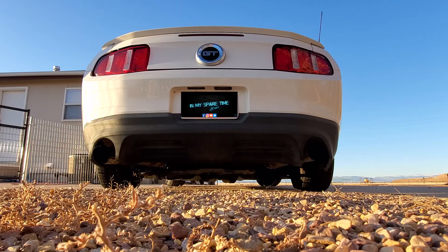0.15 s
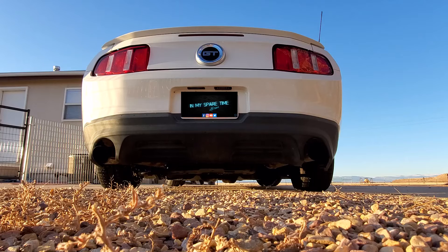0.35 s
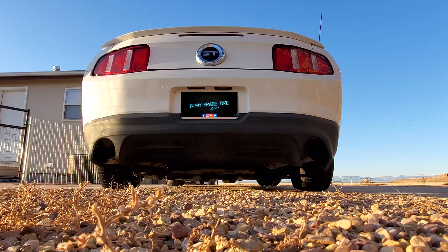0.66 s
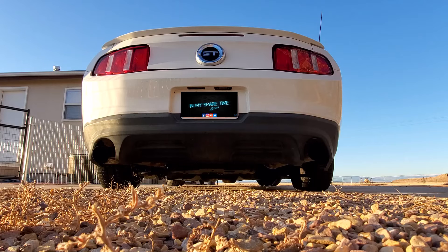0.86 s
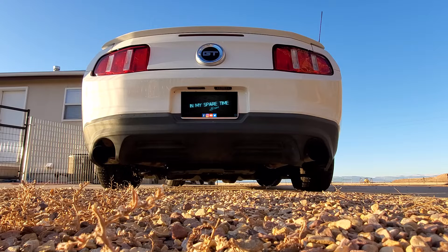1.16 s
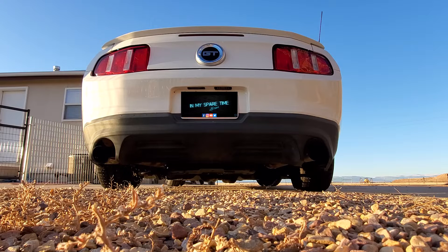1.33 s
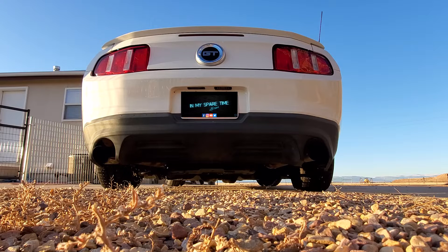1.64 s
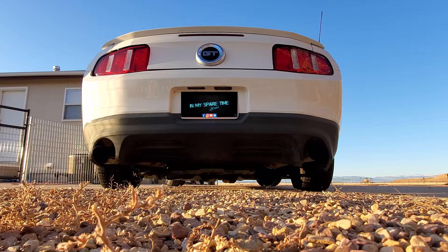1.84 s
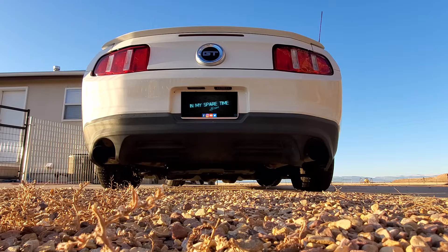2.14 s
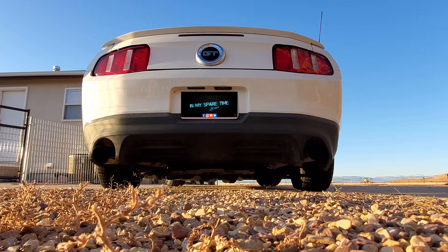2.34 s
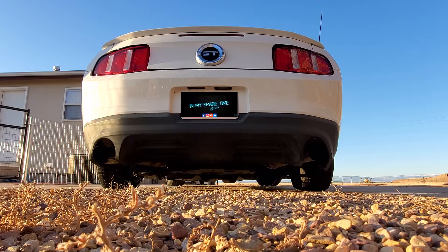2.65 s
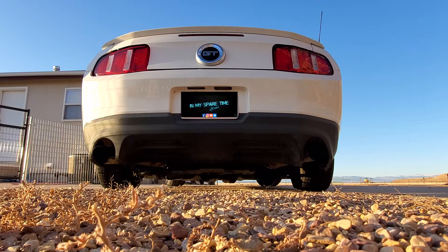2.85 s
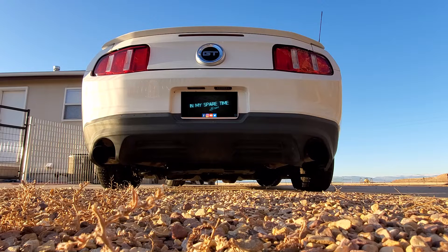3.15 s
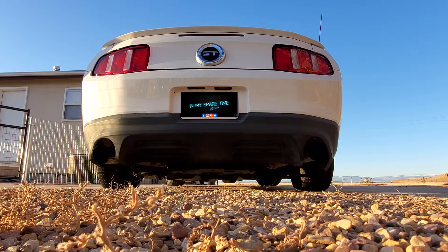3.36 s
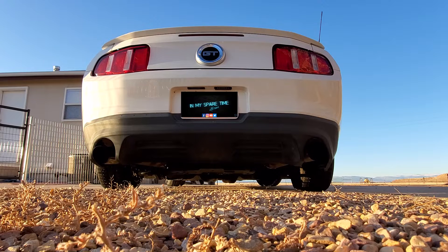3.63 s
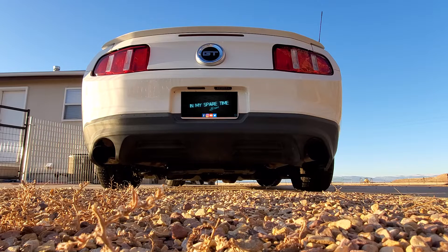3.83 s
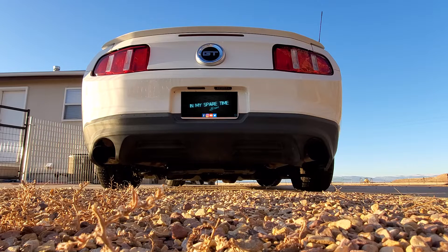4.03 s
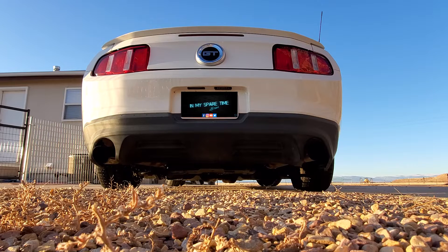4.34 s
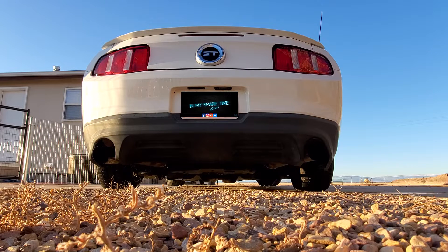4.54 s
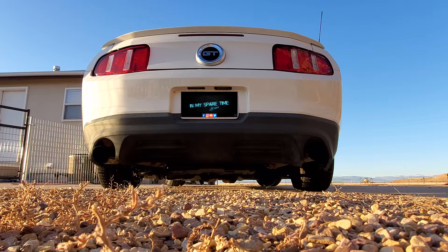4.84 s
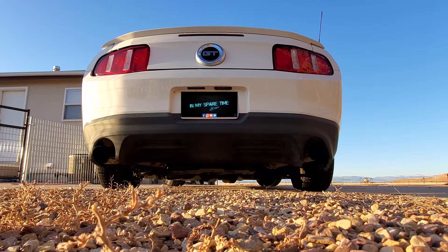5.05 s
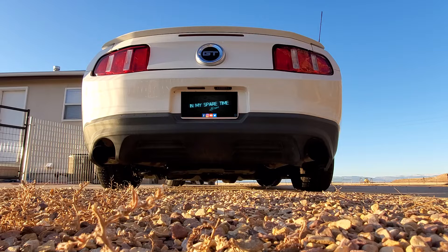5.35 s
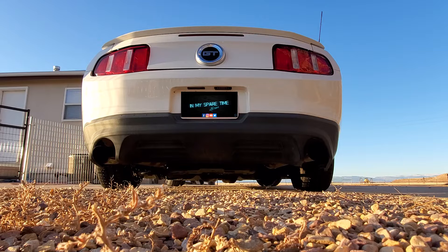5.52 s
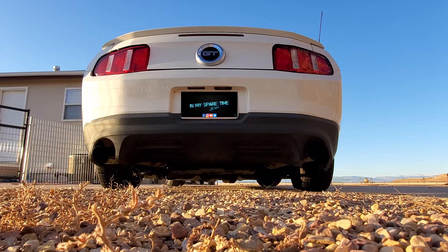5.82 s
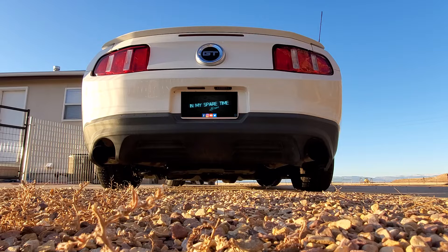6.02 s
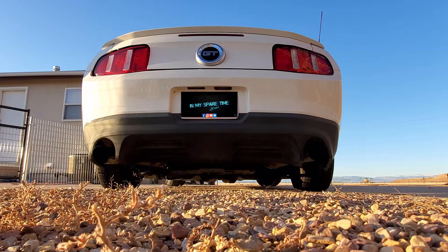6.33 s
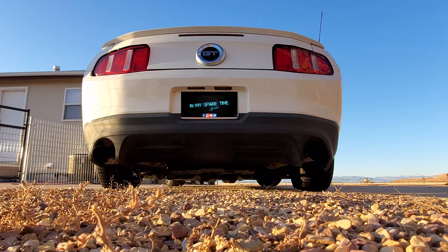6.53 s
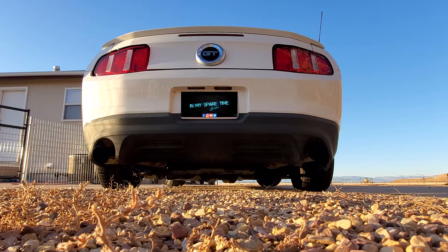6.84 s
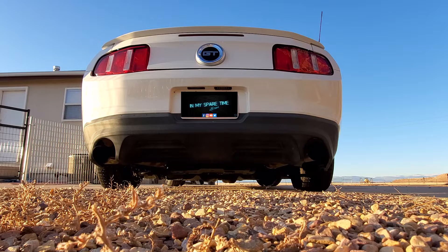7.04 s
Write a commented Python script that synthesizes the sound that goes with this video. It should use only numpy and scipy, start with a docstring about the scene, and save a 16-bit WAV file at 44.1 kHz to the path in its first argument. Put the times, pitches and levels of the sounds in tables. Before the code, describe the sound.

Outdoors on gravel, close behind the two open tailpipes of a V8 car, dry stereo. For the first 0.2 s there is only quiet air and a low hum. At 0.2 s the starter clacks in; a rough whine climbs while gears grind and groan, with rattles and dull pipe thumps at about 0.4, 0.5, 0.6, 0.7, 0.75 and 0.85 s, coming faster. At 0.9 s the engine catches with loud, ragged, cracking blows and a short roar, flares to a single hard tone around 1.1-1.35 s, then falls back, its boom dipping near 1.5 s. A deep, fast, loping idle follows, with a thin faint whistle clearest around 2-2.8 s. From 2.5 s gas rasp and ticking grow; small crackles pop from 3.6 s. Around 5 s the idle settles slightly slower and throatier, with sharper ticks snapping out, continuing until 7.2 s.

```python
"""Outdoors, from the gravel just behind the two tailpipes of a V8 without mufflers; still air and a low hum all round.
The starter clacks in, whines and cranks, with a thump down the pipes and a gear rattle at each compression.
The engine catches with hard ragged blows, flares once and falls back to a loping fast idle, under a thin whistle.
Two banks of pulses ring modelled pipe resonances; noise puffs and sharp ticks add the gas rush and the edge.
Gas and ticks then grow with the load, single ticks snap out, and the idle settles to a slower lope."""
import sys
import numpy as np
from scipy import signal
from scipy.fft import rfft, irfft
from scipy.io import wavfile
from scipy.ndimage import uniform_filter1d

SR = 44100
rng = np.random.default_rng(int(sys.argv[2]) if len(sys.argv) > 2 else 0)


def pcm_store(signal):
    """Save signal as 16-bit PCM."""
    levels = np.round(np.clip(np.atleast_2d(signal), -1, 1) * 32767)
    wavfile.write(sys.argv[1], SR, levels.astype(np.int16).T)


N = 316638
TIME = np.arange(N) / SR
FIRST_FIRING_S = .912

# crank speed: [t/s, firing rate/Hz]
SPEED = [(0.91, 8.35), (1.0, 72.61), (1.1, 74.16), (1.25, 90.31), (1.6, 74.98), (2.0, 65.71), (2.35, 63.65),
         (2.8, 66.32), (3.2, 71.2), (3.4, 68.55), (3.85, 70.83), (4.5, 68.01), (5.85, 63.47), (6.75, 63.78),
         (7.18, 62.43)]
# the bank, 0 or 1, that each cylinder fires into, in firing order
BANKS = [0, 1, 1, 0, 1, 0, 0, 1]
# colour of the ticks: [f/Hz, level/dB]
TICK_COLOUR = [(1120, -37.5), (1900, -6.5), (2830, -2.5), (3380, -3.5), (3690, -3), (4860, -2), (5310, -5),
               (5860, -4.5), (7500, -6.5), (9530, -15.5), (12700, -14), (14700, -7.5), (15800, -23)]


def undb(db):
    """Amplitude ratio of a level in dB."""
    return 10 ** (np.asarray(db) / 20)


def curves(rows):
    """The columns of a table, joined by straight lines in time."""
    s, *columns = np.transpose(rows)
    return [np.interp(TIME, s, c) for c in columns]


def unit(x):
    """Scale to an RMS of 1."""
    return x / np.sqrt(np.mean(x ** 2))


def steady(x):
    """Unit level over about two engine cycles, so that the throb within a cycle stays."""
    size = SR // 8
    power = np.mean(np.atleast_2d(x) ** 2, axis=0)
    power = uniform_filter1d(uniform_filter1d(power, size), size)
    return x / np.sqrt(np.abs(power) + 1e-3 * np.mean(power))


def colour(x, points):
    """Causal minimum-phase filter whose spectrum passes through (Hz, dB) points."""
    size = 8192
    hz, db = np.transpose(points)
    f = np.maximum(np.fft.rfftfreq(size, 1 / SR), 1)
    magnitude = undb(np.interp(np.log(f), np.log(hz), db))
    # folding the cepstrum forward in time makes the filter causal
    cepstrum = irfft(np.log(magnitude))
    cepstrum[1:size // 2] *= 2
    cepstrum[size // 2 + 1:] = 0
    response = irfft(np.exp(rfft(cepstrum)))
    return signal.fftconvolve(np.atleast_2d(x), response[None], axes=1)[:, :N]


def resonate(x, hz, width_hz):
    """One resonance, with a gain of 1 at its peak."""
    return signal.lfilter(*signal.iirpeak(hz, hz / width_hz, SR), x + 1e-18)


def band(x, order, edge_hz, kind):
    """Butterworth filter: low, high or band."""
    return signal.sosfilt(signal.butter(order, edge_hz, kind, fs=SR, output="sos"), x)


def clicks(times, sizes):
    """Impulses, each shared between two samples."""
    place = np.clip(np.asarray(times) * SR, 0, N)
    i = place.astype(int)
    early = np.bincount(i, sizes * (1 - place + i), N + 2)
    late = np.bincount(i + 1, sizes * (place - i), N + 2)
    return (early + late)[:N]


def fade(x, decay_s):
    """Each impulse becomes a dying tail of the same height."""
    return signal.lfilter([1], [1, -np.exp(-1 / (decay_s * SR))], x + 1e-18)


def pan(left_db):
    """Left and right gains that differ by left_db."""
    return undb(np.array([[1], [-1]]) * left_db / 2)


def noise(side_db, pan_db=0):
    """Stereo noise of unit level with a given width and lean to the left."""
    mid, side = rng.standard_normal((2, N))
    side = side * undb(side_db)
    return unit(np.array([mid + side, mid - side]) * pan(pan_db))


def wander(rate):
    """Random drift with a spread near 1, drawn afresh rate times a second."""
    knots = np.arange(0, N / SR + 1, 1 / rate)
    return np.interp(TIME, knots, rng.standard_normal(len(knots)))


def envelope(start_s, attack_s, fall_db_per_s, end_s, release_s):
    """Attack, a slowly falling hold, release."""
    age = np.maximum(TIME - start_s, 0)
    release = np.exp(-np.maximum(TIME - end_s, 0) / release_s)
    return np.minimum(age / attack_s, 1) * undb(-fall_db_per_s * age) * release


def yard():
    """A low machine hum nearby, as wavering sines, over the coloured noise of still air."""
    # hum partials: [f/Hz, level/dB]
    hum_partials = [(54, -56), (72, -34), (86.8, -55.5), (101.2, -53), (114.8, -44.5), (157, -56.5)]
    # colour of the still air: [f/Hz, level/dB]
    air_colour = [(18, -68.5), (30, -43.5), (53, -10.5), (76, -11.5), (178, -16.5), (286, -24),
                  (550, -46.5), (863, -35), (954, -45), (2080, -69.5), (12000, -91.5), (15600, -116),
                  (22000, -120)]
    hum = 0
    for hz, db in hum_partials:
        phase = 2 * np.pi * (hz * TIME + rng.random()) + 0.28 * wander(5.3)
        hum = hum + undb(db) * np.sqrt(2) * np.sin(phase)
    return hum + undb(-44.5) * unit(colour(noise(-1.5), air_colour))


def starter():
    """The solenoid clacks; gears grind in their housing, harder at each compression, which thumps down the pipes."""
    # compressions while cranking: [t/s, relative gear rattle level/dB, thump level/dB]
    strokes = [(0.397, -2, -19.5), (0.504, 4.5, -21.5), (0.598, 3, -21.5), (0.678, 9, -23),
               (0.756, 7.5, -21.5), (0.827, 8, -24), (0.87, 0, -16)]
    # colours of the gears and of the solenoid: [f/Hz, level/dB]
    gear_colour = [(88, -38.5), (160, -0.5), (300, -2.5), (390, -4.5), (464, -2.5), (522, -6.5), (575, -1),
                   (660, -11), (786, -10), (866, -6), (1030, -6.5), (1650, -24), (1780, -24.5),
                   (3880, -18.5), (8980, -46.5), (15800, -44.5)]
    clack_colour = [(120, -68), (200, -17), (439, -15), (567, -5), (1240, 1), (2000, -19), (3870, -14),
                    (5890, -19.5), (8960, -41), (15800, -26)]
    # housing resonances: [f/Hz, width/Hz, level/dB]
    housing = [(478, 30, 8), (818, 16, 10), (1020, 25, 12.5), (1060, 20, 2.5), (1240, 28, 5.5),
               (1740, 9.7, -2.5), (1820, 13, -8), (2250, 18, -12), (2810, 18, -12.5), (3250, 26, -7.5),
               (3150, 16, -8), (3860, 46, -12.5), (3840, 14, -8.5), (4244, 26, -4.5), (4578, 16, -8)]
    times, rattle_db, thump_db = np.transpose(strokes)
    # each compression loads the gears quickly and lets them go slowly
    strain = fade(clicks(times, undb(rattle_db)), decay_s=.026)
    load = 1 + uniform_filter1d(strain, size=300)
    teeth = load * undb(2.2 * wander(300))
    grind = unit(colour(noise(-11.0, pan_db=2.5), gear_colour)) * teeth
    drive = noise(-3.0) * teeth
    ring = sum(undb(db) * resonate(drive, hz, width) for hz, width, db in housing)
    engaged = undb(-31) * envelope(.205, attack_s=0.0067, fall_db_per_s=9.5, end_s=1.2, release_s=0.034)
    gears = (undb(-10.0) * grind + undb(-12.0) * unit(ring)) * engaged
    clack = unit(colour(noise(0), clack_colour)) * fade(clicks([.208, .221], undb([-31.5, -34])), 0.015)
    thumps = thump(times, thump_db, hz=73.7, width_hz=63, deep_db=-2)
    return gears + clack + thumps + groans() + whine()


def whine():
    """The starter's gears whine on a rough, broken pair of tones, left of centre; the pinion clinks as it is thrown out."""
    # spin-up, labouring, letting go and coasting: [t/s, mean f/Hz, level/dB]
    spin = [(.205, 1700, -76), (.25, 2300, -58), (.3, 3150, -60), (.36, 3800, -57), (.41, 4150, -59),
            (.44, 3850, -57), (.51, 4550, -60), (.57, 5000, -66), (.64, 5300, -68), (.72, 5350, -74),
            (1.0, 5400, -77), (1.3, 5000, -86), (1.48, 4450, -80), (1.62, 3900, -81), (1.73, 3250, -84),
            (1.88, 2800, -83), (2.0, 2500, -100)]
    pitch_flutter, level_flicker_db = .027, 4.5  # pitch as a share
    hz, db = curves(spin)
    flutter = pitch_flutter * (wander(600) + .5 * wander(40))
    phase = 2 * np.pi * np.cumsum(hz * (1 + flutter)) / SR
    first = undb(level_flicker_db * wander(70)) * np.sin(phase)
    second = undb(level_flicker_db * wander(70)) * np.sin(1.1 * phase)
    turning = (TIME > .205) * (TIME < spin[-1][0])
    tones = (first + undb(-6.0) * second) * undb(db) * turning * pan(14)
    clink = unit(resonate(noise(1.5), 2760, 350)) * fade(clicks([1.052], undb([-43.5])), 0.016)
    return tones + clink


def groans():
    """The straining starter groans on rough tones of its housing."""
    # groans: [t/s, length/s, f/Hz, starting level/dB]
    groan_rows = [(0.237, 0.083, 516, -46), (.405, 0.051, 799, -39), (0.415, 0.031, 1060, -43),
                  (0.502, 0.052, 465, -35.5), (0.506, 0.034, 795, -38), (.53, 0.023, 880, -44),
                  (.6, 0.042, 470, -39), (.602, 0.03, 1020, -46), (0.68, 0.113, 1013, -43.5),
                  (.756, 0.022, 1050, -38.5), (.824, 0.018, 554, -34.5), (.827, .05, 1010, -46)]
    out = 0
    for s, length_s, hz, db in groan_rows:
        roughness = 0.77 * wander(90.3) + 0.17 * np.array([wander(150), wander(150)])
        tone = np.sin(2 * np.pi * hz * TIME + roughness) * undb(db + 2.5 * wander(120))
        out = out + tone * envelope(s, .008, 35, s + length_s, 0.0096)
    return out


def thump(times, peak_db, hz, width_hz, deep_db):
    """Dull blows down the pipes: a few heavy swings that swell in, with a deeper push and a throaty overtone."""
    blows = clicks(times, undb(peak_db))
    blows = uniform_filter1d(uniform_filter1d(blows, size=210), size=210)
    swings = resonate(resonate(blows, hz, width_hz), hz, width_hz)
    deep = resonate(resonate(blows, 52, 24), 52, 24)
    throaty = resonate(resonate(blows, 135, 63), 135, 50)
    mix = resonate(swings + undb(deep_db) * deep, hz, 0.62 * hz) + undb(-2) * throaty
    # the tallest swing reaches the highest peak asked for
    return -mix * undb(np.max(peak_db)) / np.abs(mix).max()


def catch():
    """The first hard firings thump down the pipes."""
    # firings: [t/s, relative level/dB]
    first_firings = [(0.91, -2), (0.962, -4), (0.985, -5.5), (1.004, -4), (1.04, -3.5)]
    return thump(*np.transpose(first_firings), hz=79.8, width_hz=41, deep_db=-6)


def settled():
    """Near 0 at fast idle, rising smoothly towards 1 in the slow lope."""
    middle_s, spread_s = 5.05, 0.86
    return .5 + .5 * np.tanh((TIME - middle_s) / (2 * spread_s))


def effort(unloaded_db, flare_db, load_db, settle_db):
    """A layer's gain as the throttle shuts after the flare, the load builds up and the idle settles."""
    flare_end_s, flare_release_s, load_from_s, load_rise_s = 1.235, 0.071, 2.52, 1.16
    flare = 1 / (1 + np.maximum(TIME - flare_end_s, 0) / flare_release_s)
    load = 1 - np.exp(-np.maximum(TIME - load_from_s, 0) / load_rise_s)
    return undb(unloaded_db + flare_db * flare + load_db * load + settle_db * settled())


def sag():
    """The gain of the pipes dips quickly while the revs fall back and recovers slowly."""
    dip_db, dip_at_s, in_s, out_s = -7.5, 1.52, 0.38, .62
    late = TIME - dip_at_s
    return undb(dip_db * np.exp(-(late / np.where(late < 0, in_s, out_s)) ** 2))


def cycle_swell(depth_db, turns, place):
    """A gain that swells once an engine cycle, at a place counted in firings."""
    return undb(depth_db * np.cos(2 * np.pi * (turns - place) / len(BANKS)))


def engine():
    """Eight cylinders fire in turn into two banks: each firing gives a boom, a puff of gas and a tick."""
    # cylinders in firing order: [strength level/dB, valve timing t/s]
    cylinders = [(2.4, -0.00641), (2.5, -0.00527), (-1.5, -0.00682), (0.4, -0.00829), (1.0, -0.00529),
                 (-0.8, -0.00793), (-1.7, -0.0083), (-1.1, -0.00636)]
    # sharpness of each blow, in firing order: [gas level/dB, tick level/dB]
    edges = [(3.5, 6.5), (1.5, -2.5), (-1, -3), (-0.5, 1), (1, 1.5), (-0.5, -3.5), (-0.5, -5), (3.5, 2)]
    turns = np.cumsum(curves(SPEED)[0] * (TIME >= FIRST_FIRING_S)) / SR  # counted in firings
    firing = np.arange(int(turns[-1]) + 1)
    times = np.maximum(np.interp(firing, turns, TIME), FIRST_FIRING_S)
    order = np.c_[BANKS, cylinders, edges]
    bank, strength_db, timing, gas_edge, tick_edge = order[firing % len(BANKS)].T
    chance = rng.standard_normal((len(firing), 4)).T
    # combustion is ragged just after the catch, then repeats closely
    ragged = 1 + 3 * np.exp(-(times - FIRST_FIRING_S) / .5)
    size = undb(strength_db + 0.56 * ragged * chance[0])
    opens = times + timing + .00007 * ragged * chance[1]
    blows = times - .003
    sharp = undb(gas_edge + 0.68 * chance[2])
    fronts = blows + .0001 * ragged * chance[1]
    # in the rev, where the firing rate meets the pipe resonance, the lope gives way to one tone
    rev = undb(-6) * envelope(1.068, attack_s=0.15, fall_db_per_s=42, end_s=1.37, release_s=0.053)
    lope = boom(opens, size, bank) * boom_gain(rev)
    rev_tone = rev * undb(1.8 * wander(60)) * np.sqrt(2) * np.sin(2 * np.pi * turns)
    overtones = bark(clicks(opens, size * np.where(bank, 1, .45)), turns)
    rasp = puffs(blows, sharp, turns) + ticks(blows, undb(tick_edge + 1.6 * chance[3]))
    rasp = rasp + blast(fronts, sharp, bank)
    running = np.clip((TIME - FIRST_FIRING_S) / 0.068, 0, 1)
    return (lope + overtones + burble(turns) + rasp) * running + rev_tone


def boom(opens, size, bank):
    """Each bank's pulses ring its pipe; the settled lope moves its weight up the pipe."""
    # change once settled: [f/Hz, width/Hz, share added]
    lope_shift = [(87, 7.5, -0.25), (145, 93, 0.39)]
    pipes = steady(sum(tailpipe(clicks(opens, size * (bank == b)), b) for b in (0, 1)))
    shift = sum(share * resonate(pipes, hz, width) for hz, width, share in lope_shift)
    return pipes + settled() * shift


def boom_gain(rev):
    """The boom takes over from the first hard firings and yields power to the rev, keeping at least half."""
    gain = effort(unloaded_db=-13.5, flare_db=3.5, load_db=-0.67, settle_db=-1.7)
    power = (gain * sag()) ** 2
    left_over = np.sqrt(np.maximum(power - rev ** 2, 0.5 * power))
    return left_over * np.clip((TIME - 0.92) / 0.17, 0, 1)


def tailpipe(pulses, bank):
    """One bank's pipe rings; its open end radiates no deep bass, and the long run dulls the pulse."""
    # pipe resonances: [f/Hz, width/Hz, signed share of the first bank, of the second bank]
    pipe_modes = [(54.1, 19.0, 0.169, 0.365), (87.3, 12.0, 0.186, 1.0), (101.1, 42.0, -0.477, -0.797),
                  (126.6, 13.0, 0.24, 0.416), (150.8, 24.0, 0.434, 0.12), (159.9, 18.0, -0.13, 0.052),
                  (188.0, 21.0, 0.111, 0.063), (206.9, 16.0, -0.05, 0.055), (234.8, 20.0, 0.017, 0.054),
                  (265.3, 24.0, 0.022, 0.017), (288.7, 22.0, -0.039, 0.003), (303.3, 24.0, 0.046, 0.005),
                  (324.4, 22.0, -0.07, 0.031), (334.2, 25.0, 0.048, -0.039), (367.0, 24.0, 0.004, 0.015),
                  (393.6, 24.0, 0.005, 0.03), (409.3, 19.0, 0.038, -0.042), (424.9, 26.0, -0.026, 0.031),
                  (467.6, 20.0, 0.025, -0.08), (470.3, 20.0, -0.022, 0.073), (507.1, 24.0, 0.003, 0.005),
                  (530.7, 22.0, 0.004, -0.006)]
    ring = sum(shares[bank] * resonate(pulses, hz, width) for hz, width, *shares in pipe_modes)
    return band(band(ring, 6, 850, "low"), 4, 52, "high")


def puffs(blows, sharp, turns):
    """Each blow lets out a short puff of rushing gas over a faint steady rush."""
    # colour of the gas rush: [f/Hz, level/dB]
    gas_colour = [(150, -5), (300, 11.5), (480, 6.5), (650, -1.5), (850, -5), (1050, -15), (1300, -18),
                  (1600, -38.5), (2500, -54)]
    bursts = fade(clicks(blows, sharp), decay_s=.007)
    gas = colour((bursts + 0.1) * rush(turns), gas_colour)
    return steady(gas) * effort(unloaded_db=-41, flare_db=7.5, load_db=11, settle_db=-4.5)


def rush(turns):
    """Gas leaving the pipes: slow swirls largely repeat with the crank, fine turbulence does not."""
    swirl_hz = 800  # the swirls lie below, the turbulence above
    size = SR // len(BANKS)
    place = turns % len(BANKS) / len(BANKS) * size
    pattern = np.interp(place, np.arange(size), rng.standard_normal(size))
    swirls = band(0.96 * pattern + 0.63 * noise(-0.76), 3, swirl_hz, "low")
    fine = band(noise(-9.5), 3, swirl_hz, "high")
    # the swell once a cycle runs out over the second before 4.7 s
    depth_db = 4 * np.clip(4.7 - TIME, 0, 1)
    return (swirls + fine * undb(1.5 * settled())) * cycle_swell(depth_db, turns, place=1.7)


def ticks(blows, sizes):
    """Each blow gives a sharp tick of flickering noise, with narrow metallic resonances."""
    # narrow tick resonances: [f/Hz, width/Hz, level/dB]
    tick_modes = [(1720, 15, 6), (1800, 9, 7), (2850, 19, 4), (3280, 34, 1.5), (3450, 25, 3), (3970, 14, 5),
                  (4620, 25, 5)]
    taps = uniform_filter1d(fade(clicks(blows, sizes), 0.012), size=110)
    hiss = noise(0.46, pan_db=5.5) * undb(2.2 * wander(500))
    dry_ticks = colour((taps + 0.2) * hiss, TICK_COLOUR)
    ring = sum(undb(db) * resonate(dry_ticks, hz, width) for hz, width, db in tick_modes)
    gain = effort(unloaded_db=-72.5, flare_db=18.5, load_db=13.5, settle_db=-1)
    return steady(dry_ticks + ring * undb(-3.5)) * gain


def blast(times, sizes, bank):
    """The steep front of each blow rings the upper resonances of its pipe, one pipe to each side."""
    # upper pipe resonances: [f/Hz, width/Hz, level/dB]
    throat = [(585, 77, 0), (646, 42, 2.5), (812, 62, -0.5), (900, 200, -6.5), (1100, 190, -10.5),
              (1220, 120, -12), (1270, 99, -15.5)]
    out = 0
    for b, lean_db in enumerate((5, -5)):
        fronts = clicks(times, sizes * (bank == b))
        ring = 0
        for k, (hz, width, db) in enumerate(throat):
            ring = ring + (-1) ** k * undb(db) * resonate(fronts, hz, width)
        out = out + ring * pan(lean_db)
    out = signal.sosfilt(signal.cheby1(6, 1, [480, 1400], "band", fs=SR, output="sos"), out)
    return steady(out) * effort(unloaded_db=-57.5, flare_db=13, load_db=8.5, settle_db=-1.5)


def bark(pulses, turns):
    """The pulses rasp on tailpipe overtones, which swell once a cycle, later in it as the idle settles."""
    # rasping overtones: [f/Hz, width/Hz, level/dB]
    overtone_modes = [(203, 13, 0), (218, 29, 0.5), (255, 12, 5), (316, 29, -5)]
    pulses = pulses * (1 + .18 * noise(-4))
    ring = sum(undb(db) * resonate(pulses, hz, width) for hz, width, db in overtone_modes)
    ring = band(ring, 4, [180, 480], "band")
    swelling = ring * cycle_swell(5, turns, place=0.51 + 2.4 * settled())
    return steady(swelling) * effort(unloaded_db=-34.5, flare_db=5, load_db=3, settle_db=-2.5)


def burble(turns):
    """Once an engine cycle, short gliding tones burble in turn at set places; their balance shifts as it settles."""
    # notes once a cycle: [f/Hz, climb/(Hz/s), place/firings, length/firings,
    # relative level at fast idle/dB, relative level settled/dB]
    notes = [(310, 2060, 1.16, .68, -20, -31), (427, 900, 2.1, .55, -20, -25.5),
             (384, 2400, .05, .4, -25.5, -32), (317, -2500, 3.11, .43, -26, -20.5),
             (317, -2450, 5.92, 1.03, -31, -26.5), (351, -2500, 7.35, .4, -31.5, -26),
             (236, 2450, 4.15, .59, -20, -44.5), (209, 780, 7.22, 1.3, -24.5, -30.5),
             (246, 1720, 3.7, 1, -29.5, -17), (200, -580, 1.54, .5, -22, -25.5),
             (202, -1390, 6.09, .97, -25.5, -37.5), (470, 490, 3.95, 1.6, -37, -40),
             (648, 0, 2.2, .7, -40, -52), (690, 0, .4, 0.35, -41, -52)]
    cycle, rate, late, out = len(BANKS), np.maximum(curves(SPEED)[0], 1), settled(), 0
    for hz, climb, place, length, fast_db, slow_db in notes:
        # each note starts afresh each cycle, so it stays locked to the crank
        lead = (turns - place + cycle / 2) % cycle - cycle / 2
        seconds = lead / rate
        swept = hz * seconds + climb * seconds ** 2 / 2
        tone = np.sin(2 * np.pi * swept + 0.34 * wander(120))
        level = undb(fast_db + (slow_db - fast_db) * late)
        out = out + tone * np.exp(-(lead / length) ** 2) * level
    rise = np.clip((TIME - 0.92) / 0.62, 0, 1) ** 2
    return out * sag() ** .5 * rise


def cracks():
    """Single hard firings, in the flare and now and then at idle, burst out as sharp puffs of gas."""
    # cracks: [t/s, relative level/dB, centre f/Hz]
    crack_rows = [(0.946, -25, 780), (0.996, -17.5, 945), (1.049, -34, 600), (1.064, -20.5, 877),
                  (1.079, -29.5, 950), (1.122, -33, 650), (1.14, -26, 720), (1.164, -30.5, 705),
                  (1.2, -27, 820), (1.246, -29.5, 850), (3.646, -31, 1100), (3.762, -29, 900),
                  (3.875, -39.5, 900), (3.948, -32, 700), (4.103, -36, 900), (4.217, -27, 900),
                  (4.406, -30, 860), (4.701, -28, 804), (5.616, -37, 850), (5.659, -36, 860),
                  (5.801, -33, 930), (6.051, -27, 960), (6.412, -25.5, 900), (6.619, -32, 830),
                  (6.935, -32, 1000)]
    # colour of the gas: [f/Hz, level/dB]
    gas_colour = [(150, -5), (300, 11.5), (480, 6.5), (650, -1.5), (850, -5), (1050, -15), (1300, -18),
                  (1600, -38.5), (2500, -54)]
    gas, out = noise(-13), 0
    for s, db, hz in crack_rows:
        burst = fade(clicks([s], undb([db])), 0.0037) * gas
        out = out + resonate(resonate(burst, hz, 410), hz, 410)
    return undb(21.5) * colour(out, gas_colour)


def roar():
    """The first ragged firings roar in the pipes: flickering coloured noise that soon dies away."""
    # colour of the roar: [f/Hz, level/dB]
    roar_colour = [(25, -23), (70, -13.5), (140, 4), (190, 1.5), (260, -5.5), (390, -13), (520, -21.5),
                   (700, -20), (900, -27), (1300, -42.5), (2000, -79)]
    gas = unit(colour(noise(-19.5), roar_colour)) * undb(2 * wander(90))
    return gas * undb(-21.5) * envelope(0.99, .006, fall_db_per_s=22, end_s=1.22, release_s=0.031)


def whistle():
    """A thin whistle from the running engine: one sine, wavering in phase and level."""
    # whistle: [t/s, mean level/dB]
    whistle_level = [(1.2, -95), (1.6, -76.5), (1.94, -71.5), (2.05, -62.5), (2.25, -59.5), (2.31, -76),
                     (2.45, -60.5), (2.7, -59), (2.9, -70), (7.1, -69.5)]
    tone = np.sqrt(2) * np.sin(2 * np.pi * 1018 * TIME + .7 * wander(25))
    return tone * undb(curves(whistle_level)[0] + 2.3 * wander(35))


def snaps():
    """Now and then a tick snaps out far above the rest: a short burst of tick-coloured noise."""
    # loudest ticks: [t/s, level at onset/dB]
    snap_rows = [(2.488, -58), (2.856, -61), (3.432, -57.5), (4.704, -53), (4.762, -56), (5.305, -53),
                 (5.427, -49), (5.552, -53), (5.677, -51), (6.054, -49), (6.227, -54), (6.305, -49),
                 (6.81, -51), (6.934, -50)]
    times, db = np.transpose(snap_rows)
    return unit(colour(noise(0, pan_db=6.5), TICK_COLOUR)) * fade(clicks(times, undb(db)), 0.005)


def scene():
    """The exhaust reaches the left microphone a moment after the right."""
    lag_s = .00009
    left, right = engine() + catch() + cracks() + roar() + snaps()
    exhaust = np.array([np.interp(TIME - lag_s, TIME, left), right])
    return yard() + starter() + exhaust + whistle()


def record(dry):
    """The recorder cuts the top, steeply above 15.8 kHz."""
    return signal.sosfilt(signal.ellip(8, .2, 70, 15800, fs=SR, output="sos"), dry)


dry = scene()
out = record(dry)
pcm_store(out)
```